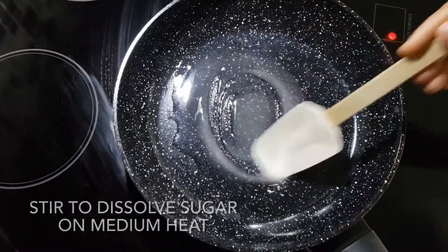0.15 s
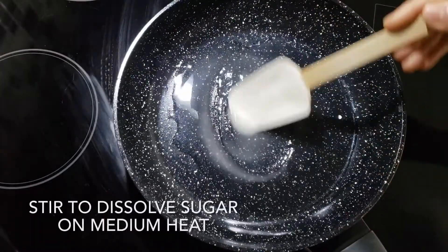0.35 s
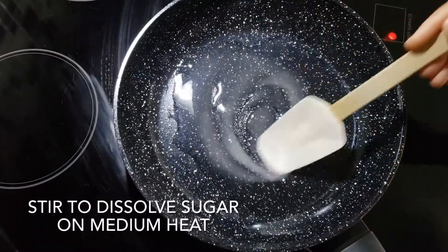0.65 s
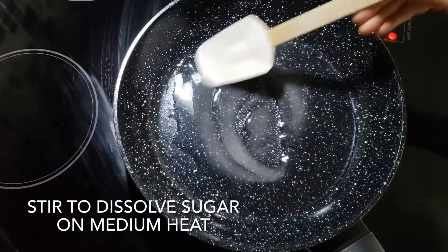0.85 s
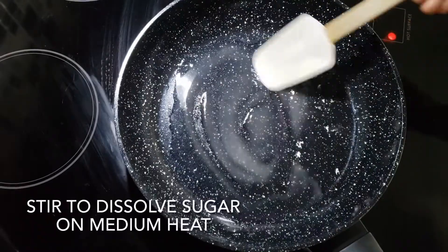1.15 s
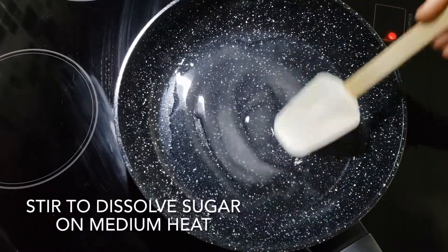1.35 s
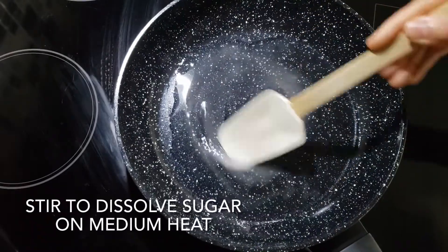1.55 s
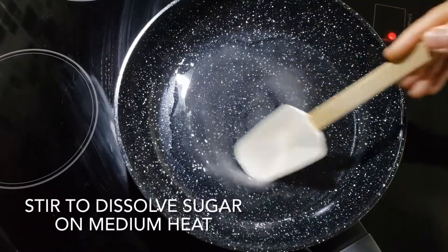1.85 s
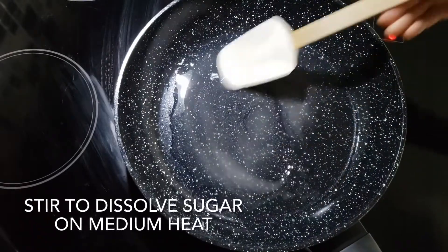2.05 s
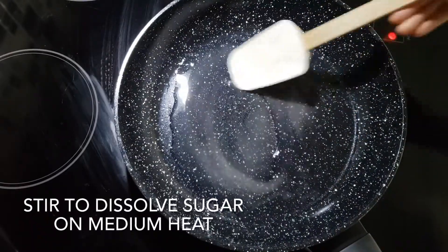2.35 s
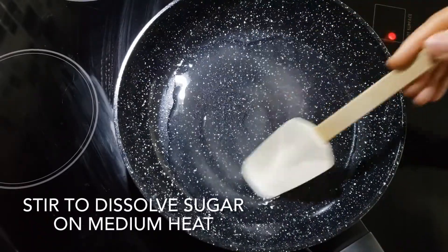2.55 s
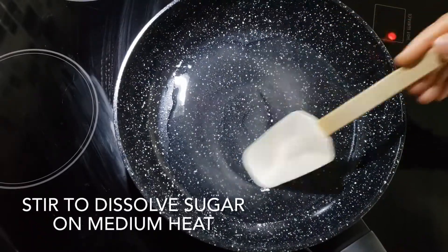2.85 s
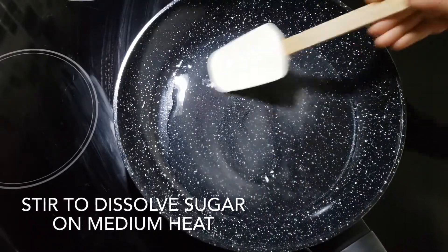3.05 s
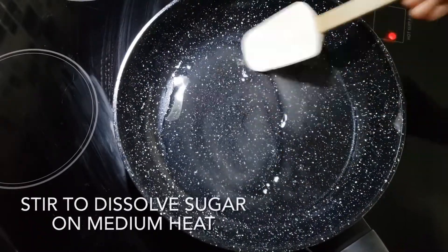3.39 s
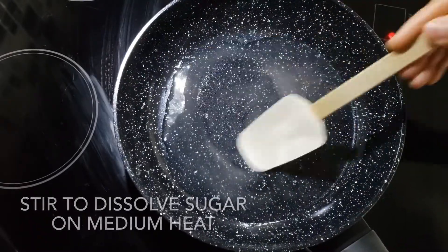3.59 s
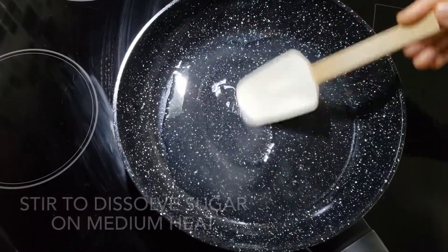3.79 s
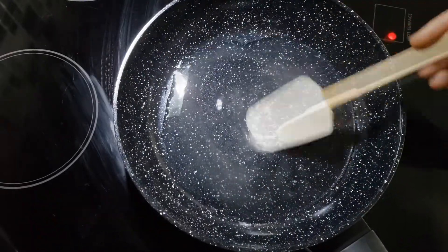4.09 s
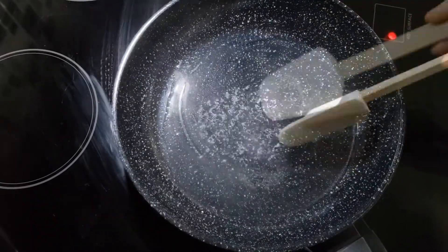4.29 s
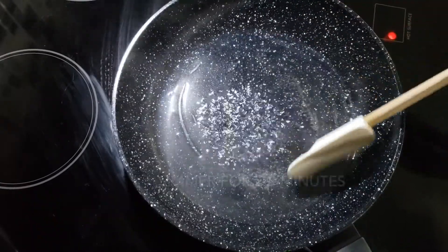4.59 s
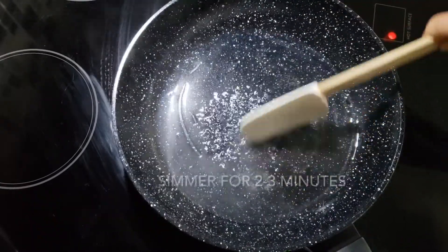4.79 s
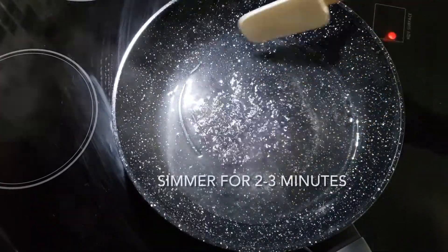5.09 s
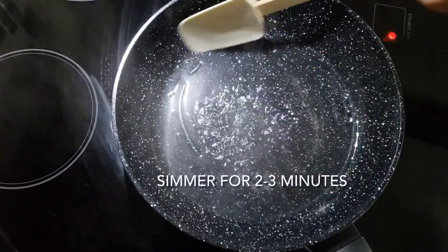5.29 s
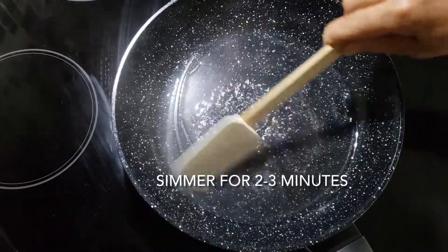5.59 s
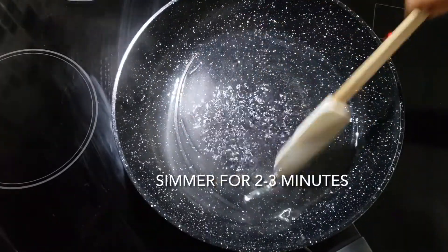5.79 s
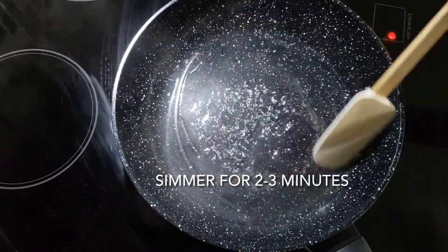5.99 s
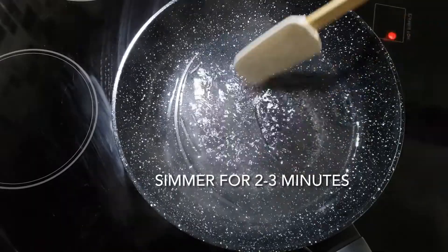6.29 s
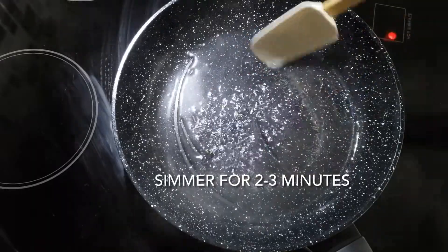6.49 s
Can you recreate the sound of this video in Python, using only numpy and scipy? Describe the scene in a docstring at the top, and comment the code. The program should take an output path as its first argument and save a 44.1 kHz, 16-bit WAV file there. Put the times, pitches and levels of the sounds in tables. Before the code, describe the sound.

A spatula scrapes gritty sugar around a nonstick pan over a low appliance hum, then the sound dissolves into fine sizzling with two hissing flares.

```python
"""Stirring and simmering sugar syrup

Sugar and water are stirred with a spatula in a nonstick pan: crystals grind on the metal and ring it faintly.
The scene dissolves into the same pan simmering: tiny bubbles sizzle, and flare up twice as syrup is pushed
over hot metal. Filtered random impulses make scrape and bubbles; gliding noise bands make swishes, short
noise bursts the pops and plops. Under both parts an appliance hums: sine lines over low filtered noise."""
import sys
import numpy as np
from scipy import signal
from scipy.fft import rfft, irfft, next_fast_len
from scipy.io import wavfile
from scipy.ndimage import map_coordinates

SR = 44100
rng = np.random.default_rng(int(sys.argv[2]) if len(sys.argv) > 2 else 0)


def log_audio(samples):
    """Write samples as a 16-bit WAV file to the path given in sys.argv[1]."""
    # one column per channel
    frames = np.atleast_2d(samples).T
    # limit to full scale, then quantise
    limited = np.clip(frames, -1, 1)
    pcm = np.round(limited * 32767).astype(np.int16)
    wavfile.write(sys.argv[1], SR, pcm)


N = 292824

# Resonances of the pan while stirring: f/Hz, width/Hz, level over the plain scrape/dB
PAN_MODES = [(1378, 42, 9.5), (2116, 23, 3.5), (3302, 44, -5), (3460, 33, 1.5), (5000, 180, -11),
             (7300, 240, -6), (8300, 80, -7), (9310, 70, -5), (10230, 76, 4), (11200, 90, -2),
             (11500, 140, -3), (13050, 90, -1), (13980, 70, 4), (15550, 250, -1)]
# Resonances of the simmering pan: f/Hz, width/Hz, level over the plain bubbling/dB
HOLLOW_MODES = [(718, 15, 10), (991, 40, 0.5), (1256, 30, 5), (1400, 73, 0), (1594, 20, 5), (1740, 40, 4),
                (1988, 12, 11), (2117, 27, 6), (2590, 47, -2)]
# Directional radiation of the stirred pan: f/Hz, left-right level/dB
PAN_LEAN = [(600, 1), (1300, 4.5), (2300, 7), (3400, -2), (4600, 1), (6500, 0), (8500, 5), (10300, 11),
            (12500, -11), (15000, 7)]


def amp(db):
    """Logarithmic level: 20 dB is a tenfold gain."""
    return 10 ** (np.asarray(db) / 20)


def unit(x):
    """Normalisation by mean power: rms 1, taken for a pair from the mean of its channels."""
    mid = np.atleast_2d(x).mean(0)
    return x / np.sqrt(np.mean(mid ** 2) + 1e-20)


def along(points, hz):
    """Interpolation of (f/Hz, value) points on a logarithmic frequency axis."""
    f, v = np.transpose(points)
    return np.interp(np.log(hz + 1), np.log(f + 1), v)


def curves(rows):
    """Linear interpolation in time: one value per sample for each column after t/s."""
    s, *cols = np.transpose(rows)
    return [np.interp(np.arange(N) / SR, s, c) for c in cols]


def wobble(rate):
    """Slow random modulation: a smooth curve through rate random knots a second."""
    knots = rng.standard_normal(int(N * rate / SR) + 4)
    return map_coordinates(knots, [np.arange(N) * rate / SR])


def filtered(x, response):
    """Linear filtering: the spectrum of x times a response of frequency."""
    m = next_fast_len(N + SR // 2)
    spectrum = rfft(x, m) * response(np.fft.rfftfreq(m, 1 / SR))
    return irfft(spectrum, m)[..., :N]


def panned(x, side_db):
    """Interaural level difference: the left channel stands side_db above the right."""
    return x * amp(np.reshape([side_db, -side_db], (2, -1)) / 2)


def grains(rate, spread_db):
    """Shot noise: two trains of impulses at random times, with random sign and size."""
    hit = rng.random((2, N)) < rate / SR
    return hit * rng.standard_normal((2, N)) * amp(spread_db * rng.standard_normal((2, N)))


def voiced(pair, spectrum, modes=()):
    """Source-filter principle: a spectrum and resonant modes colour a pair of set interaural likeness."""
    # f/Hz, likeness of left and right (1: the same, 0: independent)
    likeness = [(60, 0.91), (130, 1), (290, 0.49), (640, 0.76), (1400, 0.38), (3100, 0.18), (7000, 0)]

    def ring(f):
        return 1 + sum(amp(db) * 1j * f * w / (c * c - f * f + 1j * f * w) for c, w, db in modes)

    def response(f):
        turn = np.arccos(np.clip(along(likeness, f), -1, 1)) / 2
        return amp(along(spectrum, f)) * ring(f) * [np.cos(turn), np.sin(turn)]

    mid, side = filtered(pair, response)
    return unit(np.array([mid + side, mid - side]))


def mottled(pair, depth_db, knots_hz, rate):
    """Modal weighting: a moving source favours ever different partials, by a smooth random gain."""
    hz, t, z = signal.stft(pair, SR, nperseg=1024, noverlap=768)
    grid = np.meshgrid(hz / knots_hz, t * rate, indexing="ij")
    knots = rng.standard_normal(size=(3, 256, 256))
    fields = np.array([map_coordinates(k, grid, mode="mirror") for k in knots])
    field = (fields[:2] + fields[2]) / np.sqrt(2)  # partly shared by both ears
    gain = amp(depth_db * 2 * np.tanh(field / 2))  # no partial stands out without limit
    return unit(signal.istft(z * gain, SR, nperseg=1024, noverlap=768)[1][:, :N])


def gesture(s, length, attack, t60):
    """Forced onset and free decay: rises from s, holds until length is over, then falls exponentially."""
    t = np.arange(N) / SR - s
    return np.clip(t / attack, 0, 1) * amp(-60 * np.clip((t - length) / t60, 0, 2))


def burst(envelope, hz, octaves):
    """Band-limited transient: noise around one pitch under an envelope, with centre peak 1."""
    size = len(envelope)
    f = np.fft.rfftfreq(size, 1 / SR)
    noise = rng.standard_normal((2, size)) + 1.04 * rng.standard_normal(size)  # partly shared by both ears
    band = np.exp(-.5 * (np.log2((f + 1) / hz) / octaves) ** 2)
    puff = envelope * irfft(rfft(noise) * band, size)
    return puff / np.abs(puff.mean(0)).max()


def kitchen():
    """Tonal and broadband background: slightly unsteady hum lines on a rumble, crossfaded between parts."""
    # Appliance motor and mains lines: f/Hz, relative level stirring/dB, relative level simmering/dB
    hum = [(41.2, -79, -67), (56.4, -67, -48), (60.8, -63.5, -80), (84.7, -45.5, -85), (90.1, -62.5, -105),
           (113.8, -82, -64), (120.4, -78, -63), (168.8, -65, -83), (179.2, -65.5, -94), (241, -78, -77),
           (360.4, -77, -113)]
    # Background spectrum: f/Hz, relative density stirring/dB per Hz, relative density simmering/dB per Hz
    rumble = [(14, -22, -20), (31.3, -5, 2), (47, 1, 7), (75, -4.5, 1.5), (108, -9, 0), (131.5, -9, -1),
              (149, -12.5, -9.5), (187.5, -5, -6), (220, -19, -9), (300, -19.5, -9.5), (362, -17.5, -14.5),
              (364, -21, -6.5), (450, -20, -15.5), (479, -22.5, -7), (576, -26.5, -22.5), (945, -30, -14.5),
              (2900, -35.5, -15.5), (4970, -43.5, -31), (9000, -42, -38), (15000, -43, -41)]
    # t/s, share of the simmering part
    dissolve = [(4.03, 0.0084), (4.22, 0.38), (4.5, 0.92)]
    # f/Hz, left-right level/dB
    room_lean = [(60, -2), (110, 0.5), (200, 1), (380, -5.5), (700, 0.5), (3000, -3.5)]
    t = np.arange(N) / SR
    late, = curves(dissolve)
    stirring_rumble = voiced(rng.standard_normal((2, N)), [(hz, db) for hz, db, _ in rumble])
    before = amp(-56.5) * stirring_rumble
    lumps_db = 1.22 * wobble(8)  # the rumble under the simmer comes in lumps
    simmering_rumble = voiced(rng.standard_normal((2, N)), [(hz, db) for hz, _, db in rumble])
    after = amp(-54.5 + lumps_db) * simmering_rumble
    for hz, stirring_db, simmering_db in hum:
        waver = np.sqrt(hz / 85)  # higher lines are less steady
        level = np.sqrt(2) * amp(0.65 * waver * wobble(4.0))
        line = level * np.sin(2 * np.pi * (hz * t + rng.random()) + 0.17 * waver * wobble(3.37))
        before = before + amp(stirring_db) * line
        after = after + amp(simmering_db) * line
    room = (1 - late) * before + late * panned(after, side_db=-3.8)
    return filtered(room, lambda f: panned(0.95, along(room_lean, f)))


def squeak():
    """Stick-slip friction: the rubber edge sticks once and gives a short, almost pure chirp."""
    start_s, pitch_hz = 1.1008, 2560
    t = np.arange(N) / SR - start_s
    envelope = gesture(start_s, 0, attack=0.0012, t60=0.08)
    ring = envelope * np.sin(2 * np.pi * pitch_hz * t + .5 * wobble(200))
    return panned(amp(-50) * ring, side_db=4)


def swish():
    """Narrow-band noise on a gliding carrier: its pitch slides as the gap under the spatula changes."""
    # The edge squeezes the wet film: t/s, length/s, from f/Hz, to f/Hz, relative level/dB
    glides = [(.004, 0.028, 10800, 9300, -52.5), (0.04, 0.026, 5970, 7000, -61),
              (0.059, 0.045, 12000, 7500, -56), (0.117, 0.027, 6960, 10000, -57),
              (0.268, 0.065, 11000, 7270, -54), (0.331, 0.04, 6400, 8240, -55.5),
              (0.407, 0.017, 7400, 9830, -55.5), (0.572, 0.037, 6370, 6080, -60.5),
              (.575, 0.027, 14400, 14000, -63), (0.608, .008, 10900, 10300, -57),
              (0.637, 0.014, 9000, 8400, -57), (.95, .025, 14100, 14000, -67),
              (1.183, 0.018, 12800, 11500, -61.5), (1.53, .025, 14000, 14000, -68),
              (3.806, 0.022, 15600, 14500, -63), (3.812, 0.017, 11500, 9000, -61.5),
              (4.772, 0.06, 8180, 5200, -59), (4.79, 0.047, 12200, 11500, -56),
              (6.205, .04, 8000, 5500, -61)]
    attack_s, t60_s, width_hz = 0.0027, 0.025, 1000
    t = np.arange(N) / SR
    flutter = filtered(rng.standard_normal((2, N)), lambda f: 1 / (1 + (f / width_hz) ** 2))
    slides = np.zeros(N)
    for s, length, from_hz, to_hz, db in glides:
        remaining = np.clip(1 - (t - s) / length, 0, 1)
        hz = to_hz + (from_hz - to_hz) * remaining ** 2  # fast at first
        carrier = np.cos(2 * np.pi * np.cumsum(hz) / SR)
        slides += amp(db) * gesture(s, length, attack_s, t60_s) * carrier
    return panned(slides * unit(flutter), side_db=10.0)


def clicks():
    """Impulsive excitation: soft plops and taps in syrup; crystals crack and bubbles pop with a weaker ring."""
    # Plops and soft taps: t/s, peak level/dB, centre f/Hz, width/octaves, t60/s, left-right level/dB
    plops = [(.394, -56.5, 2270, .2, .041, 11), (.70, -61.5, 1350, .2, .12, 3),
             (.742, -60.5, 1350, .2, .08, 2), (1.1012, -51, 2700, 0.27, .02, 3),
             (1.37, -62, 1300, .25, 0.16, 3), (1.635, -62, 1350, .2, 0.15, 3),
             (2.93, -64, 1410, .25, .12, 3), (3.256, -61.5, 1850, 0.15, 0.3, 4),
             (3.315, -59.5, 1400, 0.2, 0.29, 5), (3.64, -62.5, 1400, .2, .25, 4),
             (4.785, -47, 1010, 0.17, 0.39, -1), (5.869, -45.5, 480, 0.7, 0.04, 6),
             (6.161, -51, 330, 0.77, 0.16, -10), (6.2247, -38, 1750, 0.3, 0.022, -6),
             (6.2367, -37.5, 1320, 0.2, 0.02, 0)]
    # Cracks and pops: t/s, peak level/dB, centre f/Hz, t60 of the ring/s, left-right level/dB
    pops = [(0.5698, -30, 13100, .04, -1), (0.6174, -39.5, 10300, .02, 7), (0.6392, -41, 8600, .025, 3),
            (1.013, -41.5, 9000, 0.039, -1.5), (1.5698, -47, 8500, .02, 2), (1.7996, -42, 13000, .025, -3),
            (1.8708, -49, 7000, .015, -2), (1.881, -44, 13000, .015, -4), (2.7978, -46, 12000, .02, -2),
            (4.031, -47.5, 6000, .025, 0), (4.0514, -46, 8000, .03, 0), (4.3497, -47.5, 12000, .01, -3),
            (4.7497, -25.5, 12500, .012, -4), (4.7815, -41, 5000, .03, -3), (4.7882, -36, 7500, .012, -2),
            (4.823, -38.5, 4700, .05, -10), (5.0511, -45, 9000, .01, -4), (5.302, -41, 13000, .012, -2.5),
            (5.4622, -40, 14000, .012, -3), (5.8388, -41, 10000, .01, -1.5), (5.8902, -45, 12000, .01, -4),
            (6.147, -31, 11000, .02, 2), (6.149, -24, 12500, .015, 0), (6.159, -29, 11000, .015, -4),
            (6.162, -23, 11000, 0.021, -3.5), (6.1723, -25, 11000, .03, -1), (6.1873, -33, 6000, .015, -5),
            (6.208, -35, 11000, .04, -4.5), (6.3676, -39, 13000, .015, -3)]
    crack_t60_s, ring_db, pop_octaves = .0045, -12.5, 0.56
    out = np.zeros((2, N + SR))
    t = np.arange(SR // 8) / SR
    rise = 1 - np.exp(-t / 0.00028)
    for s, db, hz, octaves, t60, side_db in plops:
        plop = burst(rise * amp(-60 * t / t60), hz, octaves)
        out[:, round(s * SR):][:, :len(t)] += panned(amp(db) * plop, side_db)
    for s, db, hz, t60, side_db in pops:
        crack = rise * (amp(-60 * t / crack_t60_s) + amp(ring_db - 60 * t / t60))
        pop = burst(crack, hz, pop_octaves)
        out[:, round(s * SR):][:, :len(t)] += panned(amp(db) * pop, side_db)
    return out[:, :N]


def flares():
    """Flash boiling: syrup turns to steam on dry metal; fine hiss swells first, coarser bubbles more slowly."""
    # Syrup meets hot metal: t/s, hiss rise/s, hold after that rise/s, hiss t60/s,
    # relative levels of hiss/dB, coarser hiss/dB, sputter/dB
    contacts = [(4.735, 0.024, 0.06, 0.33, -47, -56.5, -56.5),
                (6.143, 0.014, 0.029, 0.48, -43.5, -46, -51.5)]
    # Spectra of hiss, coarser hiss and sputter: f/Hz, relative density/dB per Hz
    hiss_spectrum = [(3000, -11.5), (6000, -2), (8500, -3), (11000, 0), (13000, -0.5), (15300, 4)]
    coarse_spectrum = [(1500, -35), (2800, -2.5), (4000, 0.5), (5500, 3), (7500, 2.5), (11000, -11)]
    sputter_spectrum = [(200, -5), (450, -3), (700, -5), (1050, 3.5), (1600, -2.5), (2800, -2.5),
                        (4500, -42)]
    t = np.arange(N) / SR
    hiss, coarse, sputter = np.zeros((3, N))
    for s, rise, hold, t60, hiss_db, coarse_db, sputter_db in contacts:
        swell = np.clip((t - s) / rise, 0, 1)
        growth = np.clip((t - s) / (1.25 * rise), 0, 1)  # bigger bubbles take longer to form
        fall_db = -60 * np.maximum(t - s - rise - hold, 0) / t60
        hiss += swell * amp(hiss_db + fall_db)
        coarse += growth * amp(coarse_db + 2.1 * fall_db)  # the coarser hiss dies away sooner
        sputter += growth * amp(sputter_db + fall_db)
    steam = hiss * voiced(grains(rate=8000, spread_db=0.5), hiss_spectrum)
    steam = steam + coarse * voiced(grains(rate=3100, spread_db=1.0), coarse_spectrum)
    spits = sputter * voiced(grains(rate=2800, spread_db=2.2), sputter_spectrum, HOLLOW_MODES)
    return panned(amp(0.61 * wobble(130)) * (steam + spits), side_db=-5.5)


def bubbles(count):
    """Bubble oscillation: damped blips that climb in pitch, scattered at random in time and between the ears."""
    typical_hz, life_cycles, climb = 1750, 17, 0.11
    t = np.arange(SR // 40) / SR
    start = rng.integers(0, N, (count, 1))
    pitch, size, place = rng.standard_normal((count, 3)).T[..., None]
    cycles = typical_hz * 2 ** (0.9 * np.tanh(pitch)) * t  # within 0.9 octave of the typical pitch
    age = np.minimum(cycles / life_cycles, 2)
    envelope = amp(3 * size - 60 * age) * (1 - np.exp(-cycles))
    blips = envelope * np.sin(2 * np.pi * cycles * (1 + climb * age))
    index = (start + np.arange(len(t))).ravel()
    ears = [np.bincount(index, (blips * (1 + ear * place)).ravel(), N)[:N] for ear in (1, -1)]
    return unit(np.array(ears))


def sizzle():
    """Superposed bubble bursts: the smallest make fizz; larger ones excite the hollow of the pan."""
    # Spectra of the smallest and the larger bubbles: f/Hz, relative density/dB per Hz
    fizz_spectrum = [(1760, -30), (3000, -14), (3470, -8.5), (4100, -3.5), (4780, -4), (5690, -4.5),
                     (7100, -6), (8200, -9), (10500, -3), (11700, -3.5), (13000, -2.5), (15600, 0)]
    bubbling_spectrum = [(350, -24), (600, 2.5), (724, -6), (786, -11), (969, 4), (1280, -6), (1430, 5),
                         (1900, 1), (2070, 1.5), (2800, 4.5), (3600, -13), (4680, -39), (7920, -120)]
    # Larger bubbles come and go: t/s, relative level/dB
    boil_levels = [(4.47, -59), (4.63, -60), (4.95, -63), (5.25, -61), (5.65, -60), (5.95, -60),
                   (6.1, -60.5), (6.4, -63.5), (6.6, -61.5)]
    # The sizzle fades in: t/s, gain
    fade_in = [(4.12, 0), (4.215, .16), (4.23, .4), (4.46, 1)]
    # f/Hz, left-right level/dB
    fizz_lean = [(3400, -5), (4700, -7.5), (6000, -4.5), (7000, -8), (8000, -14.5), (8900, 1), (11400, 0.5),
                 (12500, -2.5), (15000, -4.5)]
    bubbling_db, = curves(boil_levels)
    boil = wobble(22)  # the boil surges
    fizz = voiced(grains(rate=11000, spread_db=0.8), fizz_spectrum)
    bubbling = voiced(grains(rate=5500, spread_db=1.0), bubbling_spectrum, HOLLOW_MODES)
    fizz = mottled(fizz, depth_db=2.2, knots_hz=150, rate=14)
    bubbling = mottled(bubbling, depth_db=2.3, knots_hz=140, rate=16)
    crackle = voiced(grains(rate=420, spread_db=1.2), fizz_spectrum)  # sparser snaps out of the fizz
    fizz = unit(fizz + amp(-12) * crackle)
    bubbling = unit(bubbling + amp(-8) * bubbles(count=2200))
    flicker = amp(0.53 * wobble(170) + 0.55 * wobble(50))
    fizz = amp(-53 + .5 * boil) * flicker * fizz
    fizz = filtered(fizz, lambda f: panned(0.99, along(fizz_lean, f)))
    bubbling = panned(amp(bubbling_db + 0.45 * boil) * bubbling, side_db=-2.5)
    entry, = curves(fade_in)
    return entry * (fizz + bubbling)


def singing():
    """Friction-driven resonance: where the edge catches, it keeps neighbouring modes of the pan ringing."""
    # Register name: lowest f/Hz, highest f/Hz
    registers = {"low": (1800, 2600), "mid": (3000, 4000), "high": (9800, 10700)}
    # The edge catches: t/s, length/s, register, relative level/dB
    catches = [(0.173, 0.048, "low", -67.5), (0.279, 0.032, "low", -64), (0.45, 0.044, "low", -67),
               (0.928, 0.052, "low", -73.5), (1.165, 0.057, "low", -69), (1.34, 0.062, "low", -74),
               (1.638, .06, "low", -66), (1.94, 0.05, "low", -72), (2.424, .04, "low", -71),
               (2.756, .05, "low", -72), (3.09, .04, "low", -72), (3.904, .04, "low", -76),
               (0.12, 0.064, "mid", -66), (.38, 0.032, "mid", -69), (0.603, 0.051, "mid", -67),
               (.71, .025, "mid", -75), (.82, 0.16, "mid", -74), (1.095, .03, "mid", -71),
               (1.32, .04, "mid", -70), (1.518, 0.13, "mid", -66.5), (1.73, .03, "mid", -68.5),
               (1.85, .09, "mid", -69.5), (2.05, .03, "mid", -76), (2.196, .05, "mid", -75),
               (2.33, 0.059, "mid", -70.5), (2.428, 0.053, "mid", -68.5), (2.685, 0.044, "mid", -75),
               (2.777, .05, "mid", -68), (2.862, 0.044, "mid", -68), (3.108, .04, "mid", -68.5),
               (3.405, 0.14, "mid", -72), (3.577, .05, "mid", -82), (0.266, .016, "high", -60),
               (0.603, .03, "high", -59), (0.89, 0.051, "high", -72), (1.083, 0.038, "high", -69),
               (1.227, 0.043, "high", -66), (1.333, .06, "high", -75), (1.57, 0.097, "high", -74),
               (1.761, .05, "high", -66.5), (1.875, 0.084, "high", -71), (2.555, .08, "high", -72),
               (2.85, .04, "high", -68), (3.255, 0.065, "high", -72), (3.64, 0.037, "high", -72)]
    attack_s, t60_s = 0.011, 0.056
    out = np.zeros((2, N))
    for name, (low, high) in registers.items():
        friction = rng.standard_normal((2, N)) + 0.64 * rng.standard_normal(N)
        modes = [(hz, width) for hz, width, _ in PAN_MODES if low < hz < high]
        tone = filtered(friction, lambda f: sum(1 / (1 + ((f - hz) / width) ** 2) for hz, width in modes))
        drive = np.zeros(N)
        for s, length, register, db in catches:
            if register == name:
                drive += amp(db) * gesture(s, length, attack_s, t60_s)
        out += drive * unit(tone)
    return filtered(out, lambda f: panned(0.88, along(PAN_LEAN, f)))


def stirring():
    """Granular friction: strokes grind crystals on the pan, whose ringing varies as the spatula travels."""
    # Pushes of the spatula: t/s, length/s, relative levels of gritty hiss/dB and pan body/dB,
    # left-right level of the grit/dB
    strokes = [(0.0, 0.1, -53, -67.5, -5.5), (0.116, 0.08, -59.5, -67, 2), (0.261, 0.099, -57, -66.5, -1),
               (0.367, 0.11, -62.5, -67.5, 0.5), (0.516, 0.12, -58.5, -71.5, 0),
               (0.657, 0.07, -60.5, -68, 1), (0.825, 0.092, -69, -80, -1), (0.903, 0.088, -60, -78, -3.5),
               (1.056, 0.065, -61.5, -67.5, -2), (1.168, 0.11, -63.5, -70.5, -2),
               (1.293, 0.093, -64, -68.5, -0.5), (1.434, 0.091, -64.5, -69, -2.5),
               (1.518, 0.15, -61.5, -68, -1.5), (1.723, 0.1, -65.5, -69, -1), (1.821, 0.13, -62, -67.5, -2),
               (2.021, 0.11, -68, -70.5, -3), (2.18, 0.09, -67.5, -74, -1), (2.29, 0.12, -70.5, -77, -5),
               (2.394, 0.1, -69.5, -75, -4), (2.546, 0.092, -63.5, -73.5, -2),
               (2.667, 0.14, -63.5, -70, -1.5), (2.85, 0.097, -65, -69, -2), (3, 0.16, -67.5, -73, -7),
               (3.226, 0.11, -63, -70, -2), (3.387, 0.16, -67.5, -75, -5.5), (3.558, 0.11, -65.5, -68, -1),
               (3.73, 0.12, -68.5, -74.5, -1), (3.861, 0.047, -68, -67.5, 2), (4.01, 0.1, -69.5, -80, -3),
               (4.11, 0.087, -69.5, -73.5, -5)]
    # Spectra of crystals on the coating and of the pan body: f/Hz, relative density/dB per Hz
    grit_spectrum = [(2000, -24), (3000, -9.5), (3500, -7.5), (4100, -4), (5500, -3), (7300, -0.5),
                     (8800, -2), (10300, -1), (11700, -4), (12500, -13.5), (14000, -7), (15500, -9.5)]
    body_spectrum = [(400, -29), (800, -8), (1400, -9.5), (1800, -5), (2350, 1.5), (2850, -1.5),
                     (3500, -1.5), (4200, -17), (7000, -45)]
    attack_s, release_t60_s = 0.042, 0.26  # a push builds up, then the spatula coasts
    slips = amp(0.7 * wobble(61))  # the edge catches and slips on the crystals
    # powers, starting from the light contact between pushes
    grinding = np.full((2, N), amp(-83) ** 2)
    ringing = np.full(N, amp(-76) ** 2)
    for s, length, grit_db, body_db, side_db in strokes:
        push = gesture(s, length, attack_s, release_t60_s)
        grinding += panned(amp(grit_db) * push, side_db) ** 2
        ringing += (amp(body_db) * push) ** 2
    grit = voiced(grains(rate=12000, spread_db=0.0), grit_spectrum, PAN_MODES)
    body = voiced(grains(rate=6000, spread_db=0.0), body_spectrum, PAN_MODES)
    grit = mottled(grit, depth_db=4.4, knots_hz=330, rate=16)
    body = mottled(body, depth_db=3.6, knots_hz=200, rate=18)
    scrape = slips * np.sqrt(grinding) * grit + np.sqrt(ringing) * body
    fade_out, = curves([(4.15, 1), (4.35, 0)])
    return fade_out * filtered(scrape, lambda f: panned(1, along(PAN_LEAN, f)))


def scene():
    """Linear superposition: the kitchen background and every sound of the pan add."""
    details = squeak() + swish() + clicks()
    simmering = flares() + sizzle()
    return kitchen() + details + simmering + singing() + stirring()


def record(dry):
    """Ideal low-pass filter: only components below 15790 Hz remain."""
    return filtered(dry, lambda hz: hz < 15790)


dry = scene()
out = record(dry)
log_audio(out)
```